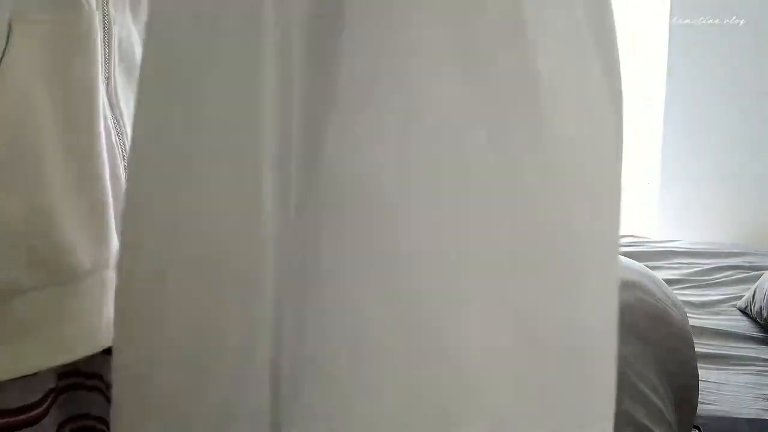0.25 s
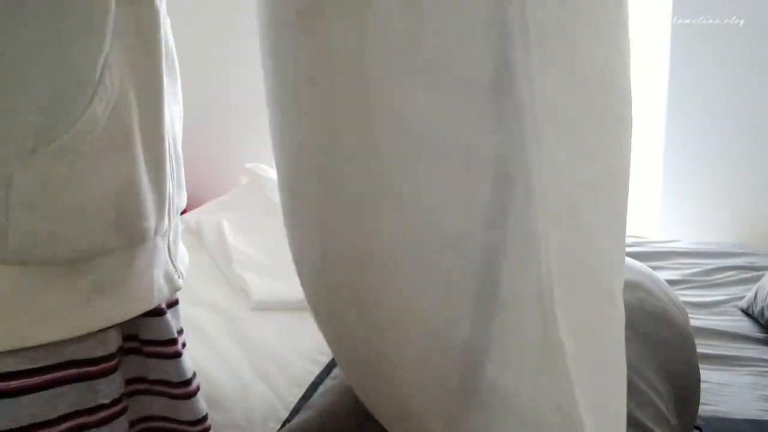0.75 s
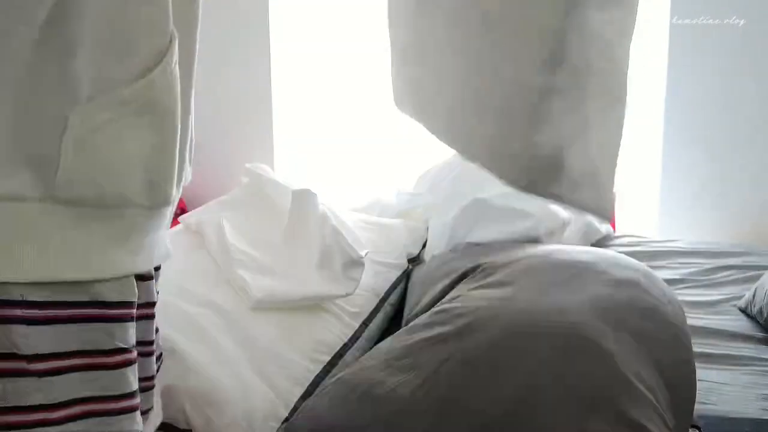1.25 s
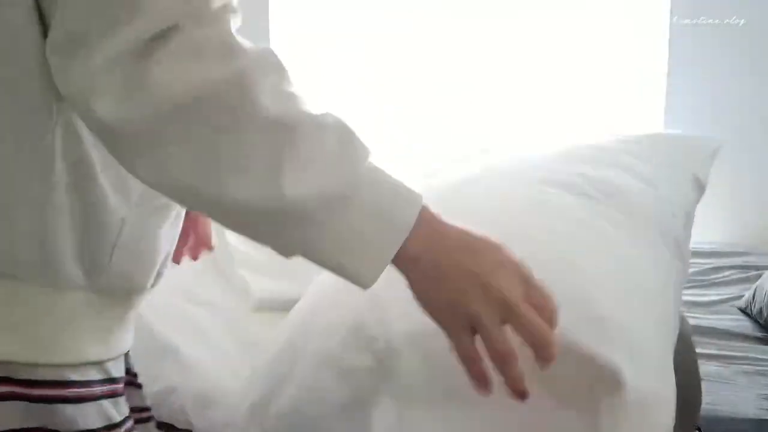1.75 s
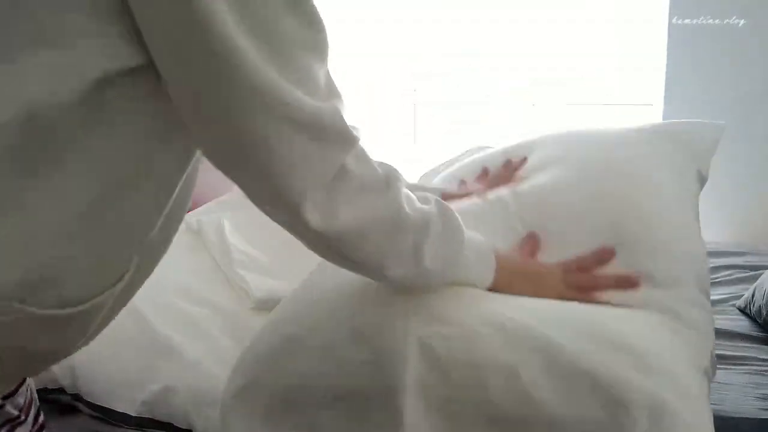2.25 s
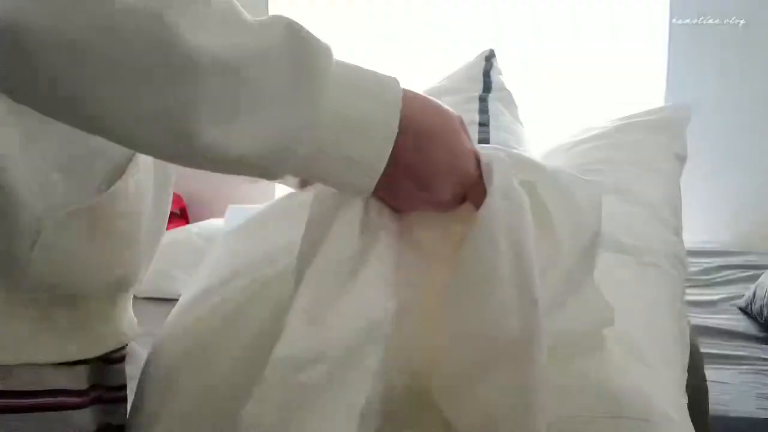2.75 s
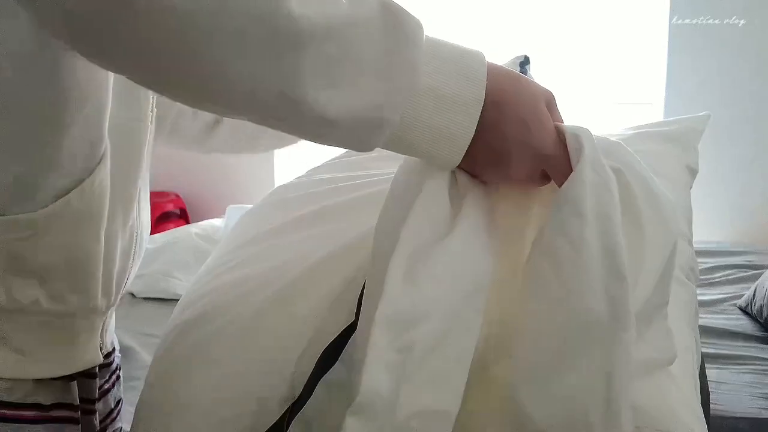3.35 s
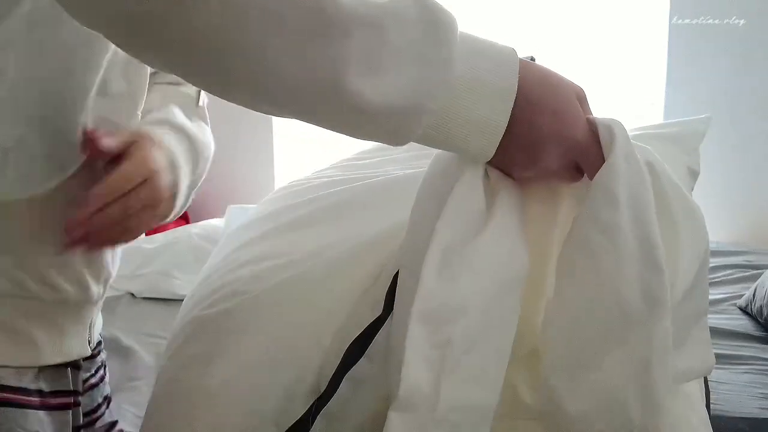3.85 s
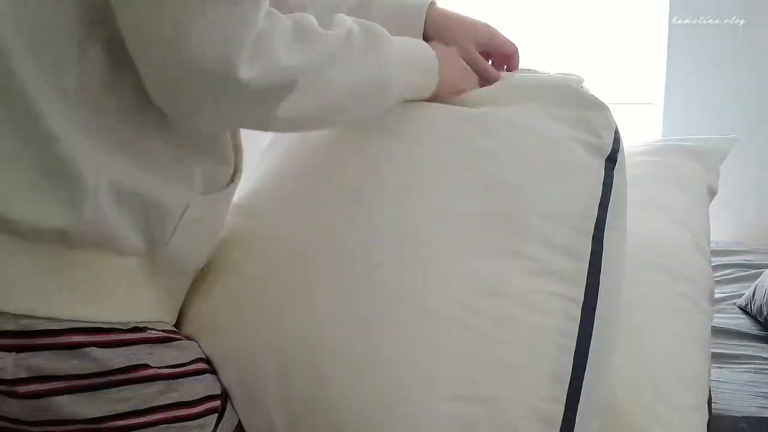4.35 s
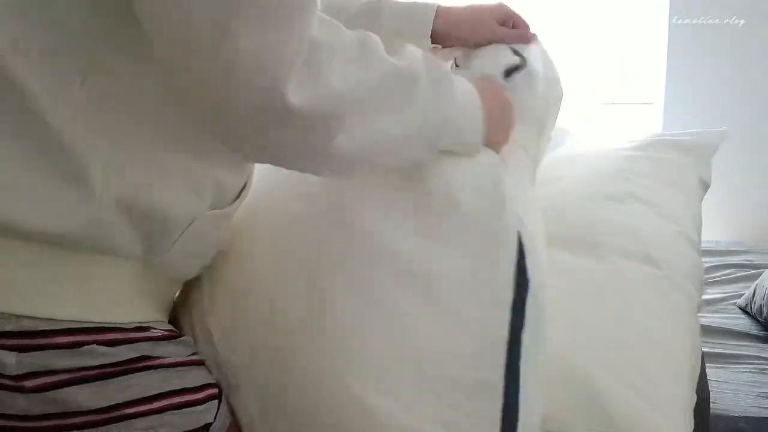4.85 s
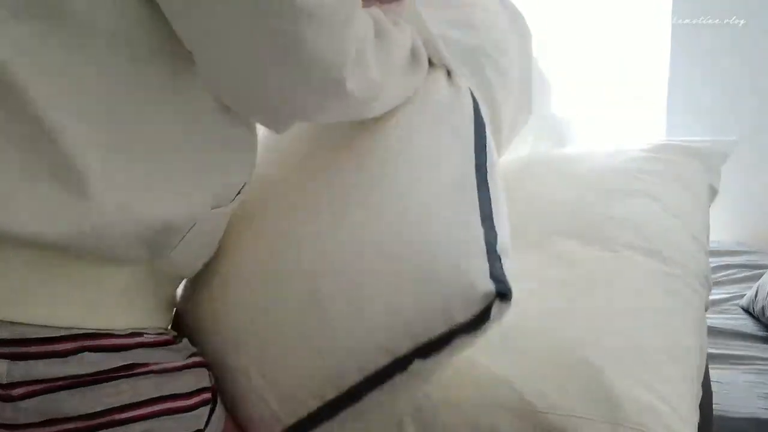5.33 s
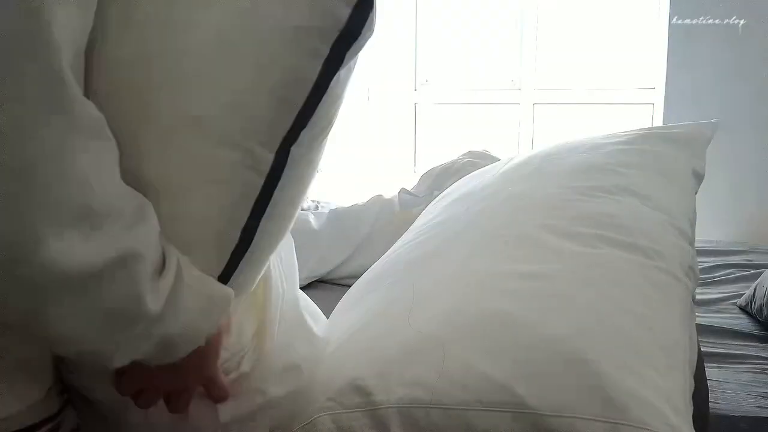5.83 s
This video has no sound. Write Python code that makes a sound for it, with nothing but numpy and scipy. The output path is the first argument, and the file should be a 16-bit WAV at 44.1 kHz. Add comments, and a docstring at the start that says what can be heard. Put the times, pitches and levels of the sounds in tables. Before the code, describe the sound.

A pillow and cotton case are handled close to two microphones in a quiet bedroom. A short rustle opens, then at 0.2 s a heavy, padded double thump with a burst of cloth swish and low air. From 0.5 to 1.5 s there is only faint rubbing. At 1.6-1.7 s a jump brings soft pats, crumpling and a crisp tick. Muffled pats follow at 2.2 s, then rustling and gentle thuds at 2.7-3.0 s. A strong crumpling thump with ticks lands at 3.6 s, with bright crease clicks at 3.7 s. It nearly quiets until 4.15 s, when light rubbing swells. Around 4.7 s taut cloth hums briefly and crumples. Slow sliding and rustling rise through 5.0-5.7 s, peaking near 5.4 s, and a soft thud lands at 5.9 s. Lumpy low rumble, thin hiss and a very faint high whine continue to about 6.1 s.

```python
"""Hands shake, pat and stuff a pillow into a cotton case in a quiet bedroom, close to two microphones. Cloth
slides and crumples, the pillow thuds and pumps air: each is shaped noise that follows the hand pressure. Pats,
heaves and ticks are short dying tones and scuffs are swells of narrow noise; sparse taps echo the pats, ticks
and scuffs. Under it lie a lumpy rumble, a thin hiss and a faint whine. At set moments the level of the handling
steps abruptly, and each move stops short at those steps."""
import sys
import numpy as np
from scipy import signal
from scipy.fft import rfft, irfft, next_fast_len
from scipy.io import wavfile
from scipy.ndimage import uniform_filter1d

SR = 44100
rng = np.random.default_rng(int(sys.argv[2]) if len(sys.argv) > 2 else 0)


def log_audio(samples):
    """Write samples as a 16-bit WAV file to the path given in sys.argv[1]."""
    # one column per channel
    frames = np.atleast_2d(samples).T
    # limit to full scale, then quantise
    limited = np.clip(frames, -1, 1)
    pcm = np.round(limited * 32767).astype(np.int16)
    wavfile.write(sys.argv[1], SR, pcm)


N = 268304

# Light fidgeting under the handling, its level stepping abruptly at each start time. Each row: start in
# seconds, then slide, crumple and thud level in dB.
STRETCHES = [(0, -76, -74.5, -68.5), (1.571, -77.5, -72, -69), (2.181, -75, -68.5, -64),
             (2.675, -78.5, -74, -65), (3.422, -87, -76, -64.5), (4.151, -73.5, -71.5, -64.5),
             (4.597, -65, -64.5, -63.5), (5.432, -72, -63.5, -61.5), (5.855, -65, -64, -58.5)]
# Shakes, presses and strokes. Each row: time of full strength in seconds, rise in seconds, hold in seconds,
# slide level in dB, sizzle in dB above the slide, crumple level in dB, thud level in dB.
MOVES = [(0, .01, 0.0029, -55.5, -3, -55, -49.5), (0.053, 0.054, 0.086, -64.5, -2.5, -62.5, -56),
         (0.221, 0.053, 0.0038, -45, -1.5, -43, -30.5), (0.395, 0.071, .005, -63, -2, -68, -50.5),
         (0.517, 0.14, 0.051, -71, 0.5, -67.5, -60.5), (0.864, 0.31, 0.11, -68, -4, -65, -61),
         (1.23, 0.13, 0.026, -76.5, -1, -73, -79), (1.41, .2, 0.2, -71.5, -3, -68, -65),
         (1.615, 0.064, .003, -65, -4, -56, -52.5), (1.668, 0.073, .01, -56.5, -9.5, -55, -42.5),
         (1.706, 0.075, 0.0046, -57, -5, -43, -38.5), (2.186, 0.012, 0.067, -56, -10.5, -47, -41),
         (2.424, .3, 0.087, -68, -10, -66, -64), (2.676, .01, 0.058, -63.5, -5, -59.5, -56.5),
         (2.832, 0.13, 0.12, -60, -2, -62, -59), (2.868, 0.062, 0.033, -57, 0, -45.5, -40),
         (2.972, 0.026, 0.0089, -64.5, -6, -54.5, -45), (3.432, 0.034, 0.0041, -69, -20, -52, -45.5),
         (3.5, 0.15, 0.13, -56, -3.5, -61, -70), (3.58, 0.14, 0.0062, -54.5, -2.5, -35.5, -34),
         (3.697, 0.11, 0.01, -55, -9, -47.5, -46), (3.924, 0.011, 0.0026, -74, -1, -81, -77),
         (4.153, .01, .15, -69, -5, -66.5, -68), (4.386, 0.23, 0.036, -63.5, -3, -64, -59),
         (4.598, .01, 0.0084, -72, -18, -60, -52), (4.659, 0.043, 0.05, -62, -3.5, -51, -70),
         (4.724, 0.15, 0.0075, -77, -3, -44.5, -46.5), (4.924, 0.46, 0.11, -62, -3.5, -60, -57.5),
         (5.176, 0.076, 0.11, -61, -1.5, -64, -53.5), (5.424, 0.39, .01, -52, -3, -53.5, -64),
         (5.546, 0.65, 0.072, -63.5, -2.5, -57.5, -56.5), (5.7, 0.17, 0.022, -71, -10, -66, -55.5),
         (5.898, 0.066, 0.012, -65, -18, -59, -52)]
RISE_DB = 23  # climb during the rise, before the steepness below
# How sharply each layer rises, as plain factors for slide, sizzle, crumple and thud.
STEEPNESS = (0.98, 1.3, 1.88, 1.39)
# How fast each layer falls, in dB per second for slide, sizzle, crumple and thud, after a very quick rise.
FALL_DB_PER_S = (173, 197, 179, 188)
LINGER_S = 0.47  # a move that rises this slowly falls half as fast
FIDGET_SIZZLE_DB, FIDGET_PER_S = -4.5, 16  # sizzle against slide; fastest rate of the uneven drift
# Depth of the fidgeting's drift. One row each for slide, sizzle, crumple and thud: depth in dB.
FIDGET_WANDER_DB = [
    [-0.1],
    [0.7],
    [3.5],
    [2.5],
]

# Tone colours of the handling, before the room adds its own.
# Each row: frequency in Hz, relative level in dB per Hz.
SLIDE = [(1120, -11.5), (1900, -5.5), (2220, -6.5), (2990, -3), (3990, -8.5), (4370, -9), (6500, -17),
         (8450, -31), (14300, -120)]
SIZZLE = [(3500, -16.5), (5500, -2), (7100, -5.5), (7730, -3), (10100, -7), (12400, -6.5), (15000, -7),
          (17000, -20.5)]
CRUMPLE = [(260, -39), (450, -0.5), (487, -5.5), (766, -3.5), (829, -8), (1140, -9.5), (2360, -26),
           (3000, -32), (3900, -80), (6600, -120)]
THUD = [(65, -13), (110, -0.5), (140, -14), (198, -0.5), (295, 0.5), (385, -0.5), (695, -9), (800, -21),
        (1040, -15.5), (1760, -120)]
AIR = [(30, -49), (50, 4), (65, -10.5), (97, -6), (145, -13.5), (170, -10.5), (260, -43), (400, -120)]
AIR_DB = -1.5  # pumped air against the thud, when nothing crumples

# Palm pats and cloth snapping taut. Each row: start in seconds, level in dB, ring in Hz.
PATS = [(0.208, -18, 199), (0.228, -14.5, 196), (1.615, -36, 151), (1.662, -27, 210), (1.7, -20.5, 243),
        (2.187, -26, 286), (2.231, -24, 219), (2.26, -26.5, 282), (2.893, -34, 300), (2.974, -30, 230),
        (3.426, -43, 318), (3.573, -20.5, 286), (3.591, -15, 291), (4.718, -41, 295), (5.862, -23.5, 287),
        (5.88, -36, 276)]
PAT_T60_S = 0.036  # time to die by 60 dB
# The whole pillow is flung or dropped. Each row: start in seconds, level in dB, frequency the push favours in Hz.
HEAVES = [(0.213, -21.5, 34.7), (.26, -31.5, 95), (0.387, -33.5, 35.7), (1.6, -36.5, 95), (1.701, -35, 95),
          (2.241, -33.5, 95), (2.372, -33.5, 50), (2.901, -37, 95), (2.969, -32, 55), (3.426, -35, 95),
          (3.587, -27, 366)]
# Low modes of the room that a heave rings. Each row: frequency in Hz, time to die by 60 dB in seconds.
RINGS = [(35, 0.25), (51, 0.1), (95, 0.22), (290, 0.33), (454, 0.24), (610, 0.086)]
REACH_DB = -23  # loss of a mode one octave from the push
# Seams and creases ticking. Each row: start in seconds, level in dB, pitch in Hz, left above right in dB.
TICKS = [(0.208, -32, 900, -2), (1.7006, -25, 740, -1), (1.706, -45, 2980, -5), (2.186, -34, 1180, -3),
         (2.1923, -41, 4270, -4), (2.231, -39.5, 3120, -5), (2.677, -45, 1220, -3), (2.853, -47, 1800, .5),
         (2.939, -44, 1500, .5), (2.978, -43, 2620, 1.5), (2.982, -37, 1490, 1), (3.428, -39, 770, -2),
         (3.588, -26, 1270, -2), (3.589, -21, 430, -6), (3.7013, -29, 3640, 5), (3.7022, -25, 1350, 3),
         (3.703, -31.5, 2520, 6), (3.926, -50.5, 5100, -.5), (4.6036, -48, 2740, -1),
         (4.657, -49, 1640, -6), (4.961, -45, 2830, 9), (5.5825, -41, 6740, -1), (5.861, -31, 554, 3),
         (5.8635, -47, 1300, -.5)]
TICK_DECAY_S, TICK_SHORTER = 0.0015, 0.72  # at 1 kHz; brighter ticks die sooner by this power of pitch
OVERTONE, OVERTONE_DB = 2.21, -11  # pitch as a multiple of the main tone; level against it
# A hand drags over taut cloth and it hums.
# Each row: start in seconds, length in seconds, level in dB, frequency in Hz, width in Hz.
SCUFFS = [(0.554, 0.11, -66.5, 1390, 400), (0.782, 0.067, -67, 1390, 400), (4.642, 0.03, -55.5, 1580, 300),
          (4.682, 0.055, -48.5, 1142, 50), (4.688, .07, -67, 2580, 400), (4.7, 0.051, -57, 1490, 120),
          (4.728, 0.071, -57, 302, 30)]

# Standing waves of the bedroom, then broad lifts of the microphone housing.
# Each row: frequency in Hz, width in Hz, lift in dB.
ROOM_MODES = [(37.4, 13, 2.5), (61, 36, 3.5), (94, 11.5, 10.5), (137.8, 8.6, 11.5), (196.6, 36, 7.5),
              (230, 7.4, 8), (286.9, 15, 12), (318, 29, 3), (376, 51, 3.5), (450, 28, 2.5),
              (552, 13.5, 5.5), (788, 14, 8.5), (900, 72, 4), (1065, 22, -7), (1496, 990, 7.5),
              (2780, 1500, 3), (4300, 590, 4), (6180, 560, 1), (9470, 330, 3.5)]
# How fast the bedroom's echo dies. Each row: frequency in Hz, time to die by 60 dB in seconds.
BEDROOM = [(100, 0.44), (260, 0.41), (700, 0.51), (1800, 0.79), (5000, 0.46), (12000, 0.85)]
ECHO_DB = -10.5
# How alike left and right are, for near sounds and for the still room.
# Each row: frequency in Hz, likeness (1 is the same, 0 unrelated, below 0 opposed).
SAME = [(25, 0.66), (120, 1), (240, 0.87), (480, 0.57), (950, 0.033), (1400, 0.87), (1890, 0.72),
        (3770, 0.15), (7520, 0.14), (15000, .06)]
DIFFUSE = [(25, 1), (60, 0.99), (150, 0.94), (380, 0.62), (950, -0.55), (2380, 0.1), (5980, -0.21),
           (15000, 0.02)]
# Balance of the two microphones. Each row: frequency in Hz, left above right in dB.
LEAN = [(25, 3.5), (60, 1.5), (150, -1), (500, 1.3), (1000, 1.5), (2400, -0.5), (6000, -.5), (15000, -1.2)]

# Distant low rumble through the building. Each row: time in seconds, level in dB.
RUMBLE = [(0, -49.5), (.5, -47), (1.2, -55.5), (1.7, -47), (2, -55.5), (2.5, -47.5), (3.2, -52.5),
          (3.8, -54), (4, -45.5), (4.3, -51.5), (4.6, -43), (5.001, -53), (5.4, -47.5), (6.08, -51)]
# Colours of the rumble and the still room's hiss. Each row: frequency in Hz, relative level in dB per Hz.
RUMBLE_BAND = [(8, -30), (16, -14), (28, 2), (42, -2), (60, -15), (90, -71), (200, -120)]
QUIET = [(15, -48), (40, -19), (60, -9), (75, -15), (110, -16.5), (164, -26.5), (300, -28), (600, -31),
         (1000, -37), (2000, -46.5), (3700, -48), (7000, -47.5), (12000, -54), (17000, -52)]
QUIET_DB = -56.5
# Faint whines. Each row: frequency in Hz, width in Hz, average (rms) level in dB.
WHINE = [(6060, 94, -82.5), (9200, 360, -85.5)]
TONE_HZ, TONE_DB, WAVER_HZ = 6015, -87, 25  # wavering tone near the stronger whine
EDGE_HZ = 15820  # upper band limit


def handling():
    """The pillow and its case rub, fold, thud and pump air, each under its own hand pressure."""
    slide, sizzle, crumple, thud = pressure()
    fibres = slips(600, 1.3, 0.0034, smooth=0.8)
    folds = slips(250, 4.1, 0.006, smooth=0.72)
    stuffing = slips(190, 1.9, 0.0024, smooth=0.92)
    out = slide * coloured(fibres, SLIDE) + sizzle * coloured(fibres, SIZZLE)
    out = out + crumple * coloured(folds, CRUMPLE)
    out = out + thud * coloured(stuffing, THUD)
    # a squeeze also pumps air, less when the cloth mostly crumples
    air = amp(AIR_DB) * thud ** 2 / (thud + 1.3 * crumple)
    return out + air * coloured(rng.standard_normal((2, N)), AIR)


def pressure():
    """Gains of slide, sizzle, crumple and thud: each move rises, holds and falls inside its stretch."""
    t, starts = np.arange(N) / SR, np.transpose(STRETCHES)[0]
    stretch = np.searchsorted(starts, t, "right") - 1
    slide, crumple, thud = np.array(STRETCHES)[stretch, 1:].T
    drifts = np.array([wander(FIDGET_PER_S) for _ in range(3)])
    drift_db = np.array(FIDGET_WANDER_DB) * drifts[[0, 0, 1, 2]]  # slide and sizzle drift together
    power = amp([slide, slide + FIDGET_SIZZLE_DB, crumple, thud] + drift_db) ** 2
    for s, rise, hold, slide_db, sizzle_db, crumple_db, thud_db in MOVES:
        own_stretch = np.searchsorted(starts, s, "right") - 1
        inside = (stretch == own_stretch) & (abs(t - s) < 1)
        early = np.maximum(s - t[inside], 0) / max(rise, 1e-3)  # in rise times
        late = np.maximum(t[inside] - s - hold, 0)  # in seconds
        top_db = np.array([slide_db, slide_db + sizzle_db, crumple_db, thud_db])[:, None]
        climb_db = RISE_DB * np.outer(STEEPNESS, early)
        fall_db = np.outer(FALL_DB_PER_S, late) / (1 + rise / LINGER_S)
        power[:, inside] += amp(top_db - climb_db - fall_db) ** 2
    return np.sqrt(uniform_filter1d(power, size=90, axis=1))  # rounds corners over 2 ms


def wander(per_s):
    """Slow uneven drift of average size (rms) 1, summed from sine waves with random starts."""
    t = np.arange(0, N + 256, 256) / SR
    rates = np.geomspace(per_s / 8, per_s, num=24)
    slow = sum(np.sin(2 * np.pi * (f * t + rng.random())) for f in rates)
    return np.interp(np.arange(N) / SR, t, evened(slow))


def slips(per_s, spread_db, length_s, smooth):
    """Fibres stick and slip: short puffs of uneven size over a smooth share of noise."""
    size = amp(spread_db * np.minimum(rng.exponential(1, N), 4))
    size = size * (rng.random(N) < per_s / SR)  # keeps only the chance moments of a slip
    puff = np.exp(-np.arange(4000) / (SR * length_s))
    power = signal.oaconvolve(size ** 2, puff ** 2)[:N]
    power = smooth + (1 - smooth) * abs(power) / power.mean()
    return np.sqrt(power) * rng.standard_normal((2, N))


def pats():
    """A palm or taut cloth sets off a brief ring that dies within a few hundredths of a second."""
    return blows([(*pat, PAT_T60_S) for pat in PATS], rise_s=0.0027)


def heaves():
    """Each heave rings the room modes, loudest those nearest to its push."""
    table = []
    for s, db, push in HEAVES:
        for hz, t60 in RINGS:
            octaves = np.log2(hz / push)
            table.append((s, db + REACH_DB * octaves ** 2, hz, t60))
    return blows(table, rise_s=0.0087)


def blows(table, rise_s):
    """A soft blow makes the stuffing or the air ring: a sine that swells in softly and dies away."""
    out, t = np.zeros((2, N)), np.arange(12000) / SR
    for s, db, hz, t60 in table:
        blow = amp(db - 60 * t / t60) * (1 - np.exp(-t / rise_s)) * np.sin(2 * np.pi * hz * t)
        sides = amp(read(LEAN, hz) * np.array([.5, -.5]))
        add(out, s, np.outer(sides, blow))
    return out


def ticks():
    """A crease lets go within a quarter cycle and rings very briefly, slightly ragged, with an overtone."""
    out, t = np.zeros((2, N)), np.arange(800) / SR
    for (s, db, pitch, pan), noise in zip(TICKS, rng.standard_normal((len(TICKS), 800))):
        ragged = 1 + .5 * uniform_filter1d(noise, size=9)
        sides_db = np.array([[pan / 2], [-pan / 2]])
        for hz, part_db in ((pitch, db), (pitch * OVERTONE, db + OVERTONE_DB)):
            decay = TICK_DECAY_S * (hz / 1000) ** -TICK_SHORTER
            onset = 1 - np.exp(-(2.9 * hz * t) ** 2)
            burst = -np.sin(2 * np.pi * hz * t) * ragged * onset * np.exp(-t / decay)
            add(out, s, amp(part_db + sides_db) * burst)
    return out


def scuffs():
    """Taut cloth hums under a dragging hand: short swells of narrow noise, partly shared by both sides."""
    out = np.zeros((2, N))
    for s, length, db, hz, width in SCUFFS:
        swell = np.hanning(round(length * SR))
        left, other = narrow(hz, width, size=16384)[:, :len(swell)]
        add(out, s, amp(db) * swell * np.array([left, 0.65 * left + 1.3 * other]))
    return out


def bedroom(x):
    """Room echo: sparse taps of random sign, each band dying at its own speed, other taps on each side."""
    taps = np.zeros((2, SR // 2))
    slots = np.arange(200, SR // 2 - 20, 20)  # one tap somewhere in every 20 samples
    at = slots + rng.integers(0, 20, (2, len(slots)))
    np.put_along_axis(taps, at, rng.choice([-1., 1.], at.shape), 1)
    hz, t, z = signal.stft(taps, SR, nperseg=256)
    fade = amp(-60 * t / read(BEDROOM, hz)[:, None])
    tail = signal.istft(z * fade, SR, nperseg=256)[1]
    return signal.fftconvolve(x, tail / np.linalg.norm(tail[0]), axes=1)[:, :N]


def still_room():
    """The quiet room: swelling low noise, steady hiss, narrow bands of noise and one wavering tone."""
    s, rumble_db = np.transpose(RUMBLE)
    swell = amp(np.interp(np.arange(N) / SR, s, rumble_db))
    rumble = swell * coloured(rng.standard_normal((2, N)), RUMBLE_BAND, DIFFUSE)
    hiss = amp(QUIET_DB) * coloured(rng.standard_normal((2, N)), QUIET, DIFFUSE)
    waver = WAVER_HZ * evened(uniform_filter1d(rng.standard_normal((2, N)), size=800))
    tone = amp(TONE_DB) * np.sqrt(2) * np.sin(2 * np.pi * np.cumsum(TONE_HZ + waver, axis=1) / SR)
    whine = sum(amp(db) * narrow(hz, width, next_fast_len(N))[:, :N] for hz, width, db in WHINE)
    return rumble + hiss + tone + whine


def narrow(hz, width, size):
    """Two channels of noise in one soft-edged band, average size (rms) 1."""
    f = np.fft.rfftfreq(size, 1 / SR)
    band = 1 / (1 + (2 * (f - hz) / width) ** 2)
    return evened(irfft(rfft(rng.standard_normal((2, size))) * band, size))


def coloured(pair, spectrum, likeness=SAME):
    """Gives two unrelated noises a spectrum, the room's modes and the microphones' likeness and balance."""
    size = next_fast_len(N)
    hz = np.fft.rfftfreq(size, 1 / SR)
    lift_db = sum(db / (1 + (2 * (hz - f) / width) ** 2) for f, width, db in ROOM_MODES)
    same = np.clip(read(likeness, hz), -1, 1)
    a, b = rfft(pair, size)
    lean = amp(np.outer([.5, -.5], read(LEAN, hz)))
    sides = np.array([a, same * a + np.sqrt(1 - same ** 2) * b]) * lean
    return evened(irfft(sides * amp(read(spectrum, hz) + lift_db), size)[:, :N])


def amp(db):
    """Turns decibels into a gain."""
    return 10 ** (np.asarray(db) / 20)


def evened(x):
    """Scales a sound to average size (rms) 1."""
    return x / np.sqrt(np.mean(x ** 2) + 1e-20)


def read(points, hz):
    """Reads between the rows of a table, with frequency on a log scale."""
    f, value = np.transpose(points)
    return np.interp(np.log(hz + 1), np.log(f + 1), value)


def add(mix, s, sound):
    """Mixes a two-channel sound in at time s, in seconds."""
    part = mix[:, round(s * SR):][:, :sound.shape[1]]
    part += sound[:, :part.shape[1]]


def scene():
    """Handling, then pats, ticks and scuffs with their echoes, heaves and the still room, added together."""
    near = pats() + ticks() + scuffs()
    return handling() + near + amp(ECHO_DB) * bedroom(near) + heaves() + still_room()


def record(dry):
    """The recorder's band limit: a steep low-pass filter removes the highest treble."""
    lowpass = signal.firwin(1023, EDGE_HZ, window=("kaiser", 9), fs=SR)
    return signal.oaconvolve(dry, lowpass[None], "same")


dry = scene()
out = record(dry)
log_audio(out)
```